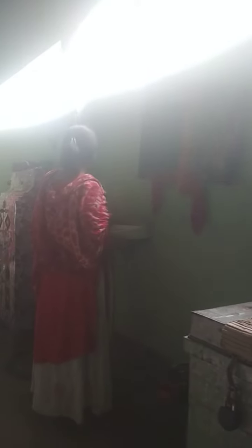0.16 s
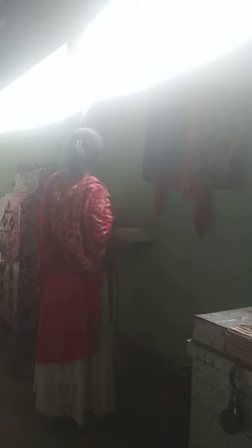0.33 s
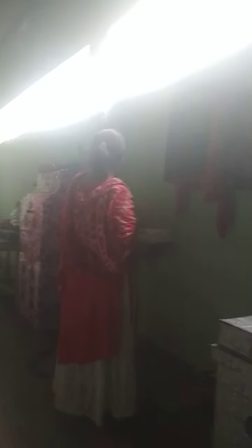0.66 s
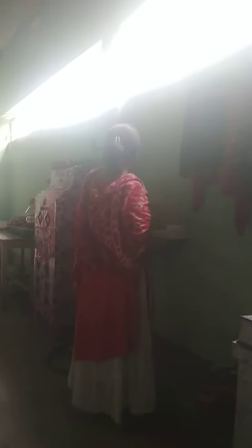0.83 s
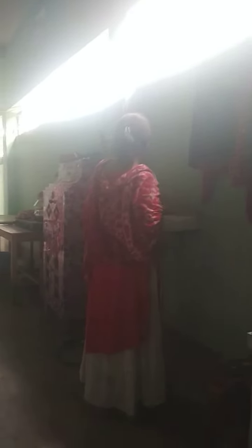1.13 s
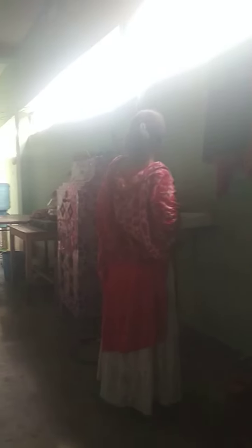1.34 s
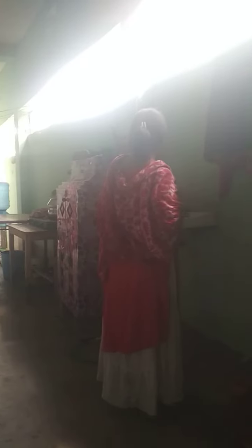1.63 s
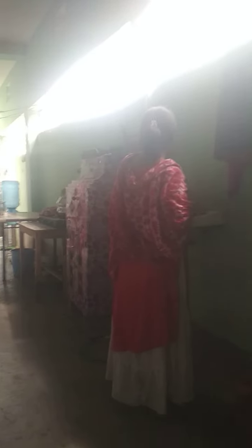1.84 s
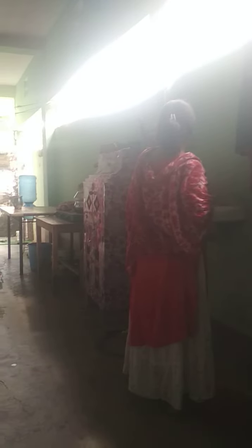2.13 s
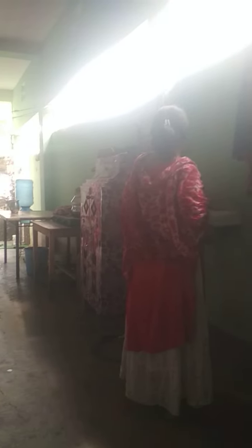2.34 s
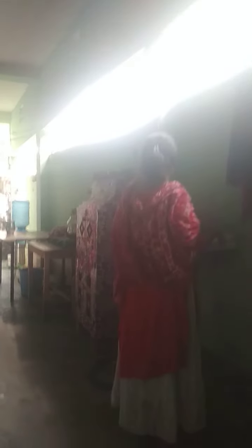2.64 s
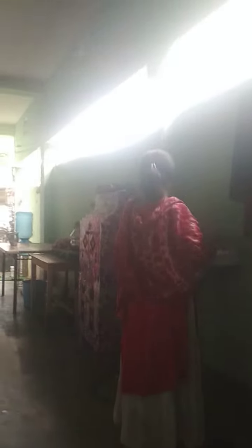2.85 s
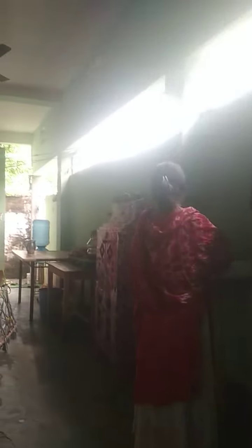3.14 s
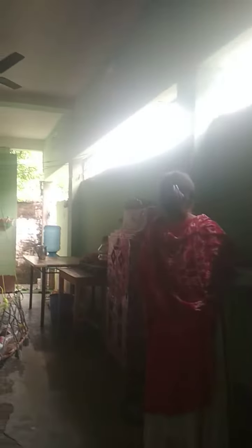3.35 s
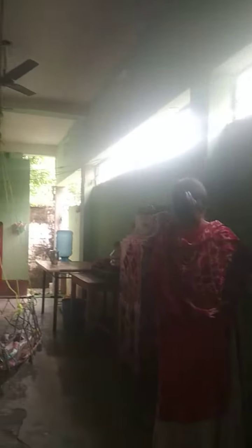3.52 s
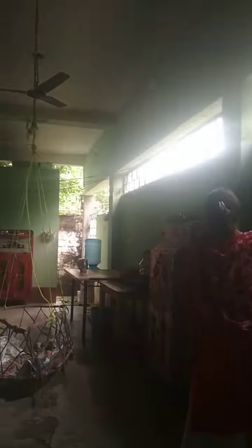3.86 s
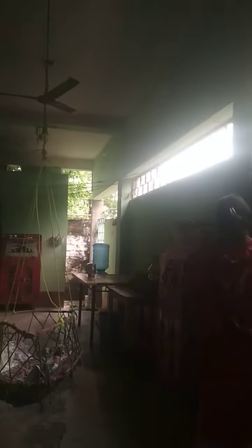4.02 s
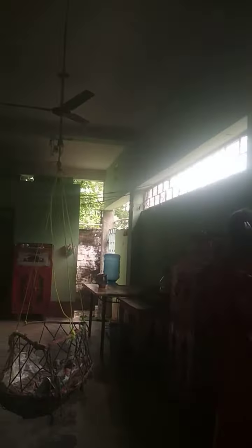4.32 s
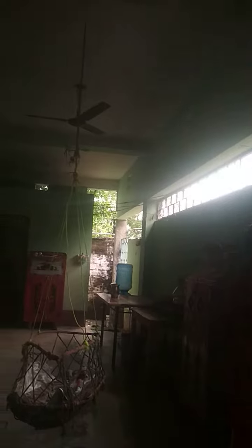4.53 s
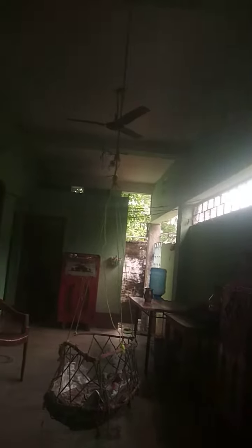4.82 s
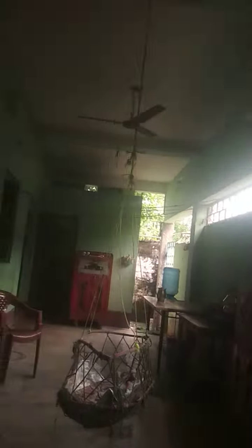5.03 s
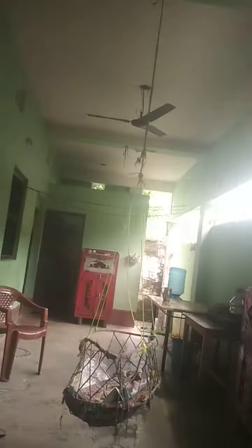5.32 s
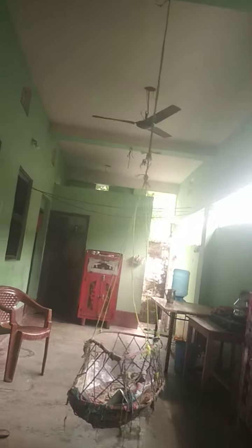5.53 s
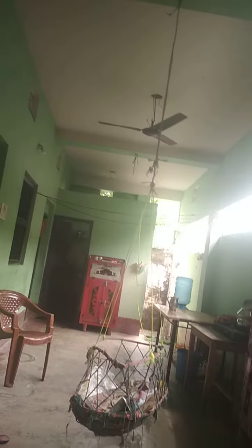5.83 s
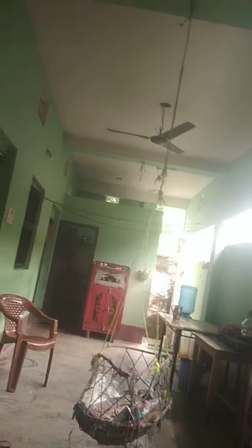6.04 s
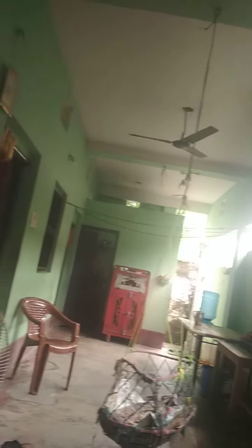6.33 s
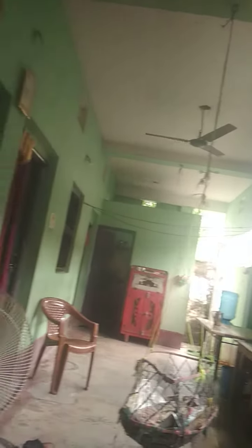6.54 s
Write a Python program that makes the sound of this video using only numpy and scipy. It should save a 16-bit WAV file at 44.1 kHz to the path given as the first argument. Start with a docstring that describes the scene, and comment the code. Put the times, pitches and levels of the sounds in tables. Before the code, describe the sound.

Steady heavy thumps of soaked washing ring through a hard-walled room, each spraying droplets, over low fan air, microphone rumble and small water sounds.

```python
"""A fan's air rushes and hums, moving air rumbles on the hand-held microphone, and a trickle runs.
Wet washing is slapped down again and again in a bare room; drips, wet taps, gushes and spatters
sound before and between the blows.
Each blow rings low modes (thump), bursts noise bands that echo and ring on (slap), cracks and sprays.
Water is noise plus small ringing bubbles; drops and gushes are tones that climb in pitch."""
import sys
import numpy as np
from scipy import signal
from scipy.io import wavfile

SR = 44100
rng = np.random.default_rng(int(sys.argv[2]) if len(sys.argv) > 2 else 0)


def unload_audio(sound):
    """Save the sound as a 16-bit wav file, at the path given as the first command line argument."""
    columns = np.transpose(np.atleast_2d(sound))
    # keep every value between -1 and 1, then stretch to whole-number steps
    steps = np.round(np.clip(columns, -1, 1) * 32767)
    wavfile.write(sys.argv[1], SR, steps.astype(np.int16))


N = 294527


def from_db(db):
    """Amplitude of a level in dB."""
    return 10 ** (np.asarray(db) / 20)


def rms_one(x):
    """Scale to rms 1."""
    return x / np.sqrt(np.mean(x ** 2) + 1e-20)


def in_time(rows):
    """Each column of a curve, sample by sample."""
    s, *columns = np.transpose(rows)
    return [np.interp(np.arange(N) / SR, s, c) for c in columns]


def at_hz(points, hz):
    """Read a table on a log-frequency axis."""
    table_hz, values = np.transpose(points)
    return np.interp(np.log(hz), np.log(table_hz), values)


def filtered(x, hz, kind, order=2):
    """Butterworth filter."""
    return signal.sosfilt(signal.butter(order, hz, kind, fs=SR, output="sos"), x)


def drift(rate_hz):
    """Slow chance with a spread of 1: noise through two equal poles, stepped every 40 samples."""
    step, settle = 40, 2000
    r = np.exp(-2 * np.pi * rate_hz * step / SR)
    white = rng.standard_normal(N // step + settle + 2)
    slow = signal.lfilter([1], [1, -2 * r, r * r], white)[settle:]
    return np.interp(np.arange(N) / step, np.arange(len(slow)), rms_one(slow))


def clicks(times_s, db):
    """One click of the given level at each time."""
    out = np.zeros(N)
    at = np.round(np.asarray(times_s) * SR).astype(int)
    out[np.clip(at, 0, N - 1)] = from_db(db)
    return out


def ring(hits, hz, t60_s):
    """A damped resonator: a unit click sets a sine of height 1 ringing."""
    r, w = from_db(-60 / (t60_s * SR)), 2 * np.pi * hz / SR
    return signal.lfilter([0, np.sin(w)], [1, -2 * r * np.cos(w), r * r], hits + 1e-18)


def dying(hits, t60_s):
    """An envelope that jumps at each click and dies away."""
    return signal.lfilter([1], [1, -from_db(-60 / (t60_s * SR))], hits + 1e-18)


def swell(middle_s, length_s):
    """A smooth rise and fall of height 1."""
    return np.exp(-(2 * (np.arange(N) / SR - middle_s) / length_s) ** 2)


def flow(steady_db, swells):
    """Amplitude of a running flow with swells (middle s, length s, dB) on top; their powers add."""
    swell_power = sum((from_db(db) * swell(s, length_s)) ** 2 for s, length_s, db in swells)
    return np.sqrt(from_db(steady_db) ** 2 + swell_power)


def noise_bands(spectrum):
    """Third-octave noise bands as (Hz, samples); together they have rms 1."""
    edges_hz = 28 * 2 ** (np.arange(26) / 3)
    centres_hz = np.sqrt(edges_hz[:-1] * edges_hz[1:])
    white = rng.standard_normal((2, N))   # neighbouring bands use different noise
    bands = []
    for k, hz in enumerate(centres_hz):
        band = filtered(white[k % 2], edges_hz[k:k + 2], "band")
        bands.append(from_db(at_hz(spectrum, hz)) * band)
    bands = np.array(bands)
    return list(zip(centres_hz, bands / np.std(bands.sum(axis=0))))


def noise(spectrum, patchy_db):
    """Coloured noise whose bands flicker on their own; rms 1."""
    return rms_one(sum(band * from_db(patchy_db * drift(36)) for _, band in noise_bands(spectrum)))


def room(x, t60_s, wet_db):
    """The direct sound plus dense reflections from bare walls."""
    t = np.arange(SR // 2) / SR
    tail = rng.standard_normal(len(t)) * from_db(-60 * t / t60_s) * (t > 0.003)
    return x + from_db(wet_db) * signal.fftconvolve(x, tail / np.linalg.norm(tail))[:N]


# Rushing air. Each row: frequency in Hz, relative level in dB per Hz.
FAN_SPECTRUM = [(30, -6.5), (60, -22), (120, -18.5), (200, 0), (300, -3), (480, -7), (900, -11),
                (1300, -21), (2100, -19), (2800, -34.5), (3800, -32.5), (5700, -17), (7000, -32.5)]
# Motor lines. Each row: frequency in Hz, rms level in dB.
FAN_LINES = [(100.3, -51.5), (399, -65.5), (678, -69)]
# Low wavering hum. Each row: time in seconds, mean rms level in dB.
HUM_LEVEL = [(0, -66), (0.86, -56.5), (1.02, -44), (1.3, -50), (1.6, -48), (2.1, -54.5), (3.8, -58),
             (4.35, -49), (5.1, -80), (6.68, -65)]


def fan(air_db=-54.5, hum_hz=210):
    """Rushing air, the motor's lines, and a hum that wavers in pitch and level."""
    t = np.arange(N) / SR
    air = from_db(air_db) * noise(FAN_SPECTRUM, patchy_db=2.3)
    lines = 0
    for hz, db in FAN_LINES:
        lines = lines + from_db(db + drift(2.8)) * np.sqrt(2) * np.sin(2 * np.pi * hz * t)
    wavering_hz = hum_hz * (1 + 0.01846 * drift(6))
    hum_db = in_time(HUM_LEVEL)[0] + 3.3 * drift(21)
    hum = from_db(hum_db) * np.sqrt(2) * np.sin(2 * np.pi * np.cumsum(wavering_hz) / SR)
    return air + lines + hum


# Air hitting the moving microphone. Each row: middle in seconds, length in seconds, level in dB.
PUFFS = [(0.256, 0.1, -33), (0.524, 0.18, -29), (0.99, 0.23, -33), (2.054, 0.77, -33.5),
         (2.363, 0.083, -24.5), (3.518, 0.18, -25.5), (4.006, 0.37, -25), (4.813, 0.057, -22),
         (5.332, 0.17, -30.5)]


def rumble(corner_hz=38, draught_db=-39, fade_db_per_s=1.17):
    """Slow lumps of air pressure at the microphone port: a faint draught that dies down, and puffs."""
    lumps = filtered(rng.standard_normal(N), corner_hz, "low")
    lumps = filtered(filtered(lumps, 4.25, "high"), 210, "low")
    fading_db = draught_db - fade_db_per_s * np.arange(N) / SR
    return flow(fading_db, PUFFS) * rms_one(lumps)


def bubbles(per_s, low_hz, high_hz, t60_cycles, spread_db, count=24):
    """Countless small bubbles of uneven size ring briefly at scattered pitches; rms 1."""
    sizes = from_db(spread_db * np.minimum(rng.exponential(1, N), 3)) * rng.choice([-1, 1], N)
    born = sizes * (rng.random(N) < per_s / SR)
    dealt = rng.integers(0, count, N)   # which pitch each bubble gets
    rings = 0
    for k, hz in enumerate(np.geomspace(low_hz, high_hz, count)):
        rings = rings + ring(born * (dealt == k), hz, t60_cycles / hz)
    return rms_one(room(rings, t60_s=0.17, wet_db=7))


# Low water noise. Each row: frequency in Hz, relative level in dB per Hz.
SLOSH_SPECTRUM = [(100, -21.5), (400, -1), (1000, 11), (1900, 9.5), (2800, -18), (7000, -12.5)]
# Running trickle before drainage. Each row: time in seconds, slosh level in dB, fizz level in dB.
TRICKLE = [(0, -54.5, -60.5), (0.7, -60.5, -75), (2.1, -56.5, -64), (5.08, -54.5, -68), (5.2, -56.5, -74),
           (6.68, -59, -81)]
# Cloth squeezed. Each row: middle in seconds, length in seconds, slosh level in dB, fizz level in dB.
SQUEEZES = [(0.982, 0.5, -52, -61), (1.245, 0.2, -54, -63.5), (4.926, 0.7, -55, -61),
            (6.392, 0.42, -54, -60.5)]


def swish(drain_delay_s=0.25, drain_length_s=0.32, drain_gain_db=0.5):
    """Water trickles, runs at each squeeze and drains after each blow: bubbly slosh and fine fizz."""
    trickle_slosh_db, trickle_fizz_db = in_time(TRICKLE)
    # harder slaps drain more
    drain = sum(from_db(slap_db) * swell(s + drain_delay_s, drain_length_s)
                for s, _, slap_db, *_ in BLOWS)
    drain_db = drain_gain_db * drain
    s, length_s, slosh_db, fizz_db = np.transpose(SQUEEZES)
    slosh_bubbles = bubbles(per_s=490, low_hz=737, high_hz=2566, t60_cycles=20, spread_db=-3.0)
    slosh = from_db(-2) * noise(SLOSH_SPECTRUM, patchy_db=2.0) + from_db(-4.5) * slosh_bubbles
    fizz = bubbles(per_s=640, low_hz=2750, high_hz=6500, t60_cycles=7.6, spread_db=9.5)
    slosh_flow = flow(trickle_slosh_db + drain_db, zip(s, length_s, slosh_db))
    fizz_flow = flow(trickle_fizz_db + drain_db, zip(s, length_s, fizz_db))
    fizz_flow = fizz_flow * from_db(1.7 * drift(8.8))
    return slosh_flow * slosh + fizz_flow * fizz


# Single drops. Each row: start in seconds, starting pitch in Hz, level before the room in dB.
DRIPS = [(0.265, 879, -43), (0.754, 5520, -41.5), (0.909, 6550, -42), (1.391, 1940, -44.5),
         (1.611, 1735, -41), (2.074, 3880, -49), (2.145, 994, -44.5), (2.183, 1154, -47),
         (2.267, 5220, -42.5), (2.349, 1005, -44.5), (2.976, 5600, -41), (3.06, 2800, -50),
         (3.514, 3260, -49), (3.852, 2820, -52), (4.49, 1250, -42), (4.999, 6520, -36), (5.989, 5900, -42)]


def drips(rise=0.092, t60_cycles=120, wobble=0.071, attack_s=0.00035):
    """Each drop traps a quivering bubble whose note climbs as it fades."""
    out, t = np.zeros(N + SR), np.arange(SR // 6) / SR
    for s, hz, db in DRIPS:
        age, at = t * hz / t60_cycles, int(s * SR)   # age 1 is 60 dB down
        quiver = wobble * rms_one(filtered(rng.standard_normal(len(t)), 280, "low"))
        pitch_hz = hz * (1 + rise * np.minimum(age, 2) + quiver)
        phase = 2 * np.pi * np.cumsum(pitch_hz) / SR
        envelope = np.exp(-np.log(1000) * age) * (1 - np.exp(-t / attack_s))
        out[at:at + len(t)] += from_db(db) * np.sin(phase) * envelope
    return room(out[:N], t60_s=0.26, wet_db=-0.5)


# Light wet taps as the cloth is handled. Each row: start in seconds, relative level in dB.
TAPS = [(0.53, -32.5), (0.987, -35.5), (2.872, -41)]
# Tap colour. Each row: frequency in Hz, relative level in dB per Hz.
TAP_SPECTRUM = [(100, 3.5), (420, 5), (700, -11), (1300, -2), (2200, -10.5), (3000, -23.5), (7000, -25.5)]


def taps():
    """A fold of cloth touches down: a crisp tick with a little room after it."""
    tick = filtered(dying(clicks(*np.transpose(TAPS)), t60_s=0.066), 250, "low", order=1)
    return room(tick * noise(TAP_SPECTRUM, patchy_db=1.5), t60_s=0.22, wet_db=0)


# Water gushing out of folds. Each row: middle in seconds, length in seconds, mid pitch in Hz,
# relative level in dB.
GUSHES = [(0.83, 0.13, 871, -54), (1.22, 0.087, 1694, -55), (4.93, 0.09, 1420, -51.5),
          (4.995, 0.078, 1850, -47.5), (5.083, 0.15, 1584, -55.5), (6.147, 0.12, 2212, -56.5)]


def gushes(octaves_per_s=1.8, width_hz=130):
    """Turbulence sounds in a shrinking cavity, so its pitch climbs."""
    t, out = np.arange(N) / SR, 0
    for s, length_s, hz, db in GUSHES:
        pitch_hz = hz * 2 ** (octaves_per_s * np.clip(t - s, -length_s, length_s))
        turbulence = rms_one(filtered(rng.standard_normal(N), width_hz, "low"))
        tone = np.sin(2 * np.pi * np.cumsum(pitch_hz) / SR)
        out = out + from_db(db) * swell(s, length_s) * turbulence * tone
    return room(out, t60_s=0.33, wet_db=2)


# Water thrown off the cloth lands. Each row: start in seconds, relative level in dB.
SPATTERS = [(1.015, -7), (1.211, -11.5), (1.564, -7.5), (2.555, -1), (3.311, -4), (3.68, -9), (4.28, -12),
            (4.537, -10.5), (4.787, -7)]
# Fine spray. Each row: frequency in Hz, relative level in dB per Hz.
SPRAY_SPECTRUM = [(100, -39.5), (800, -32.5), (1800, 4.5), (3000, -5.5), (5500, 6.5), (7000, -3.5)]


def spray():
    """Clouds of droplets crackle at each blow and wherever thrown water lands."""
    s, *_, spray_db = np.transpose(BLOWS)
    bursts = clicks(s, spray_db) + clicks(*np.transpose(SPATTERS))
    crackle = rms_one(from_db(4.1 * drift(380)))
    cloud = filtered(dying(bursts, t60_s=0.14), 54, "low", order=1) * crackle
    droplets = cloud * noise(SPRAY_SPECTRUM, patchy_db=-1.0)
    return from_db(-40.5) * room(droplets, t60_s=0.55, wet_db=-3.5)


def pocket(hz, pocket_hz, width_octaves=0.6):
    """How strongly the air pocket under the cloth colours this pitch, 0-1."""
    return np.exp(-0.5 * (np.log2(hz / pocket_hz) / width_octaves) ** 2)


# Blows of the wet cloth, also read by swish and spray; levels are relative.
# Each row: start in seconds, thump in dB, slap in dB, slap brightness in dB per octave,
# air pocket in Hz, air pocket in dB, spray in dB.
BLOWS = [(1.704, -11.5, -12, 1.5, 305, -1, -8), (1.758, 0, -2, -2, 706, 0, -8),
         (2.5894, -1.5, -1, -0.5, 240, 2, -7.5), (3.1789, -4, -5, -0.5, 298, 5, -23),
         (3.919, 1, -0.5, -0.5, 554, 1.5, -7.5), (4.656, -4, -4.5, 0.5, 248, 3, -8.5),
         (5.4137, 2, 0, -1.2, 305, -4.5, -7), (6.229, -2.5, -4, -2, 395, 4, -9)]
# Low modes under every blow. Each row: frequency in Hz, relative level in dB, t60 in seconds.
BOOM_MODES = [(43.6, -34.5, 0.18), (66.8, -30.5, 0.63), (102, -15.5, 0.51), (108.8, -22.5, 0.45),
              (156.5, -27, 0.35), (172.3, -15, 0.37), (190.2, -19, 0.46), (230.7, -27.5, 0.38),
              (248.3, -9.5, 0.071), (288.5, -24, .22), (306.5, -31, 0.54), (440, -46.5, 0.086),
              (448.6, -34.5, 0.14), (490, -43, 0.2), (526, -31, 0.2), (584, -25.5, 0.22), (612, -29, 0.15),
              (689, -37.5, 0.24), (1050, -47, 0.2)]


def thumps(pop_low_hz=165, pop_high_hz=310):
    """The soft, heavy cloth pushes on every low mode, and the air trapped under it pops out."""
    s, thump_db, _, _, pocket_hz, pocket_db, _ = np.transpose(BLOWS)

    def strength_db(hz):
        return thump_db + pocket_db * pocket(hz, pocket_hz)

    scatter_db = 0.7 * rng.standard_normal((len(s), len(BOOM_MODES)))
    boom = 0
    for k, (hz, db, t60_s) in enumerate(BOOM_MODES):
        # the deepest modes move together, the higher ones in opposing directions
        sign = -1 if hz < 210 else (-1) ** k
        hits = clicks(s, strength_db(hz) + db + scatter_db[:, k])
        boom = boom + sign * ring(hits, hz, t60_s)
    # the pop is a short, well damped swell of a few cycles
    pop_hits = from_db(27.5) * clicks(s, strength_db(np.sqrt(pop_low_hz * pop_high_hz)))
    pop = filtered(pop_hits + 1e-18, [pop_low_hz, pop_high_hz], "band", order=3)
    return filtered(boom, 1300, "low") - pop


# Slap colour. Each row: frequency in Hz, relative level in dB per Hz.
SLAP_SPECTRUM = [(60, -14), (150, 0), (270, 2.5), (360, -6.5), (560, 3.5), (680, -8), (800, -12.5),
                 (1100, -8.5), (1350, -16.5), (1700, -19), (2300, -29), (3000, -55), (7000, -53.5)]
# Room ringing after a slap. Each row: frequency in Hz, t60 in seconds.
SLAP_T60 = [(100, 1), (300, 0.5), (600, 0.47), (1200, 0.58), (2500, 0.63), (7000, 0.74)]
# The smack and its first wall returns. Each row: delay in seconds, relative level in dB.
ECHOES = [(.0035, -10), (0.016, -4), (0.029, -18), (0.052, -8), (.075, -7), (.1, -36)]


def slaps():
    """Water bursts out in a grainy smack; the walls throw it back and the room rings on band by band."""
    s, _, slap_db, brightness, pocket_hz, pocket_db, _ = np.transpose(BLOWS)
    grain, out = rms_one(from_db(0.61 * drift(110))), 0
    return_s = np.concatenate([s + delay_s for delay_s, _ in ECHOES])
    for hz, band in noise_bands(SLAP_SPECTRUM):
        tilt_db = brightness * np.log2(min(hz, 2500) / 700)
        level_db = slap_db + pocket_db * pocket(hz, pocket_hz) + tilt_db
        return_db = np.concatenate([level_db + db for _, db in ECHOES])
        smacks = from_db(7.5) * dying(clicks(return_s, return_db), t60_s=0.0075)
        ringing = dying(clicks(s, level_db), at_hz(SLAP_T60, hz))
        out = out + band * filtered(smacks + ringing, 190, "low", order=1)
    return from_db(-23.0) * grain * out


def cracks(delay_s=0.0012):
    """The film of water snaps for a few milliseconds as the cloth meets the floor."""
    s, _, slap_db, *_ = np.transpose(BLOWS)
    snap = filtered(rng.standard_normal(N), 450, "high")
    snap = rms_one(filtered(snap, 870, "low", order=1))
    return from_db(-37.0) * snap * dying(clicks(s + delay_s, slap_db), t60_s=0.015)


def scene():
    """All sources summed into one channel."""
    background = fan() + rumble() + swish()
    water = drips() + gushes() + spray()
    cloth = taps() + thumps() + slaps() + cracks()
    return (background + water + cloth)[None]


def record(dry, stop_hz=7700):
    """The top is cut steeply, 45 dB down from stop_hz."""
    return signal.sosfilt(signal.cheby2(16, 45, stop_hz, fs=SR, output="sos"), dry)


dry = scene()
out = record(dry)
unload_audio(out)
```